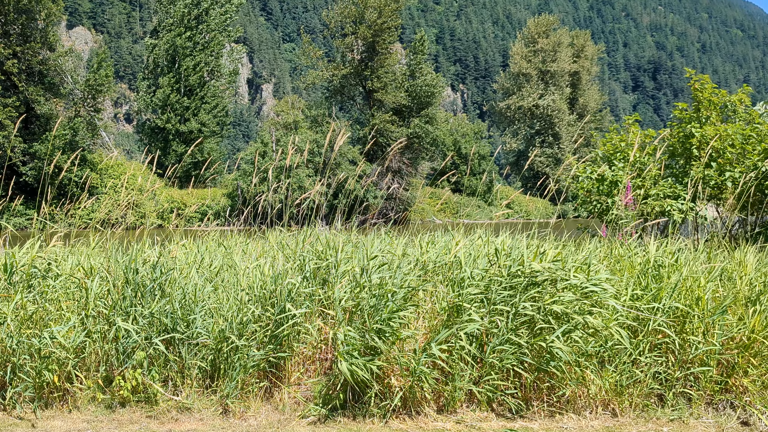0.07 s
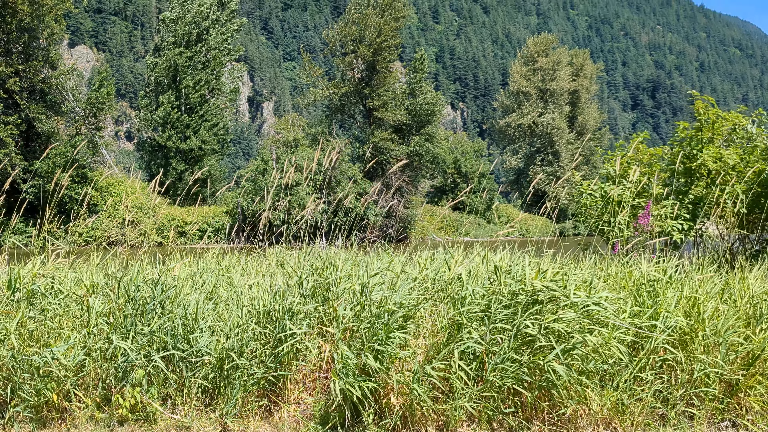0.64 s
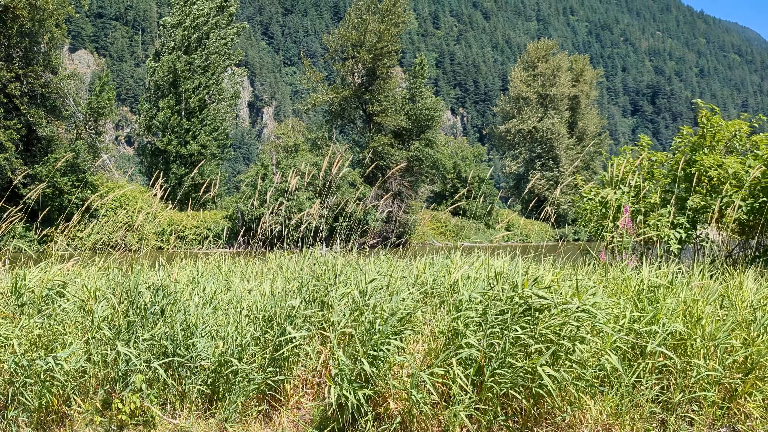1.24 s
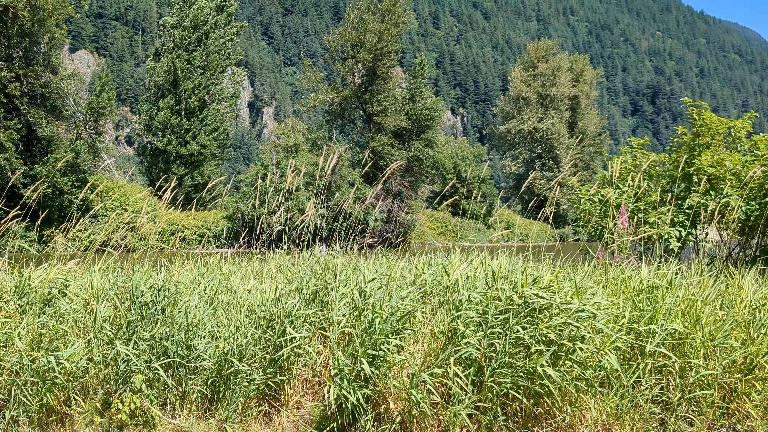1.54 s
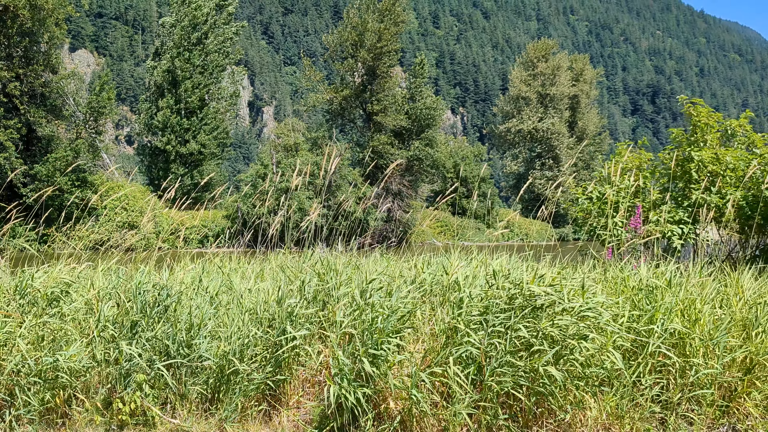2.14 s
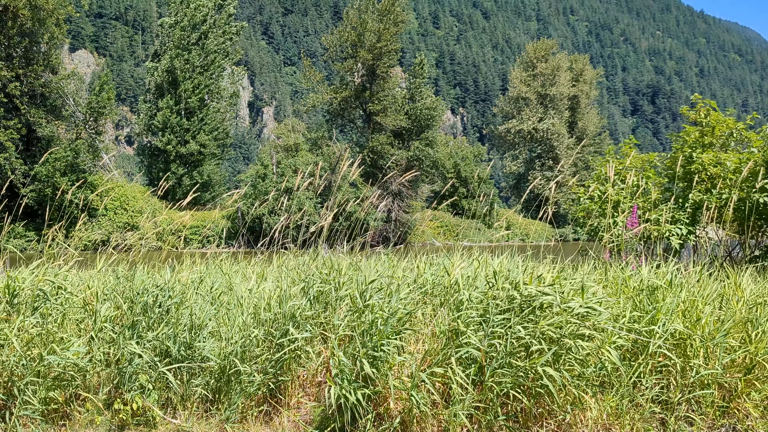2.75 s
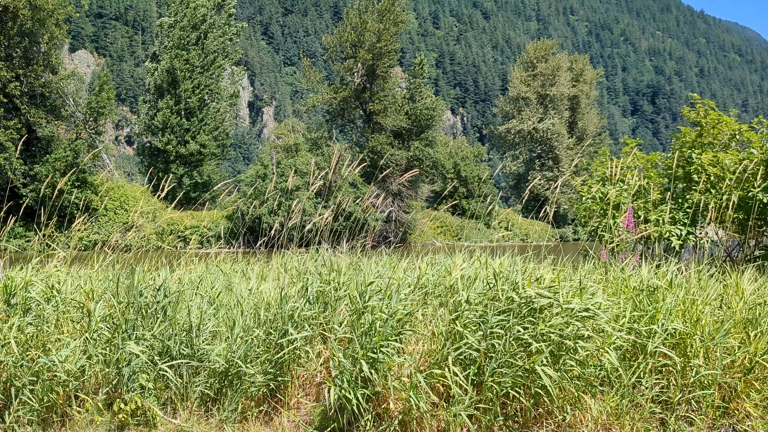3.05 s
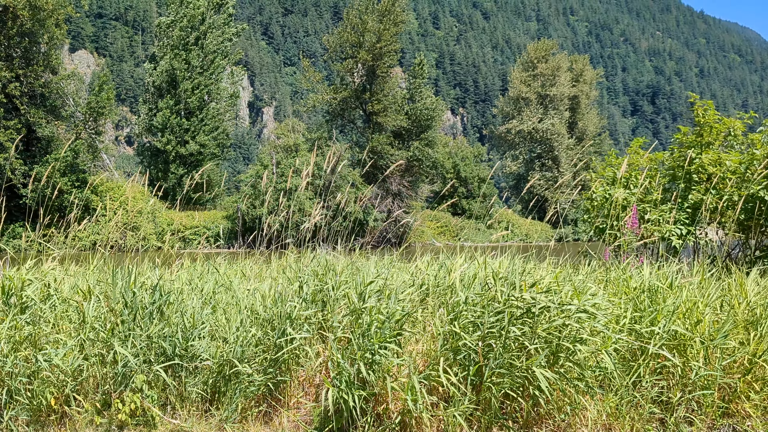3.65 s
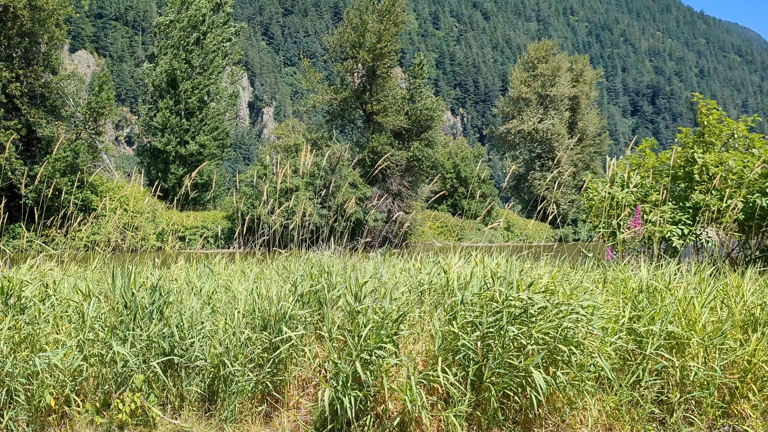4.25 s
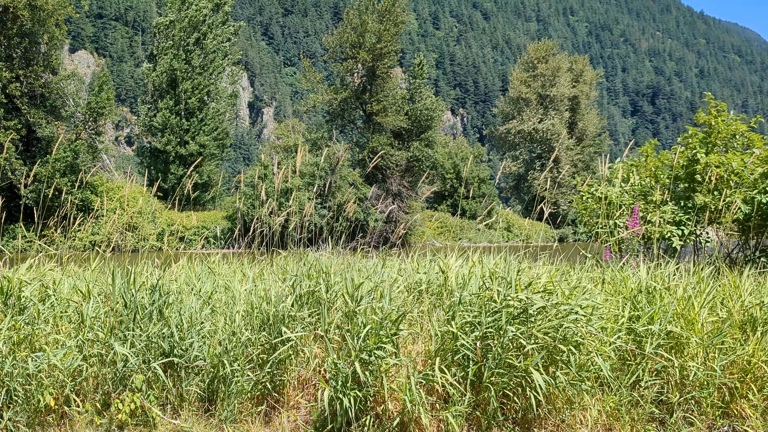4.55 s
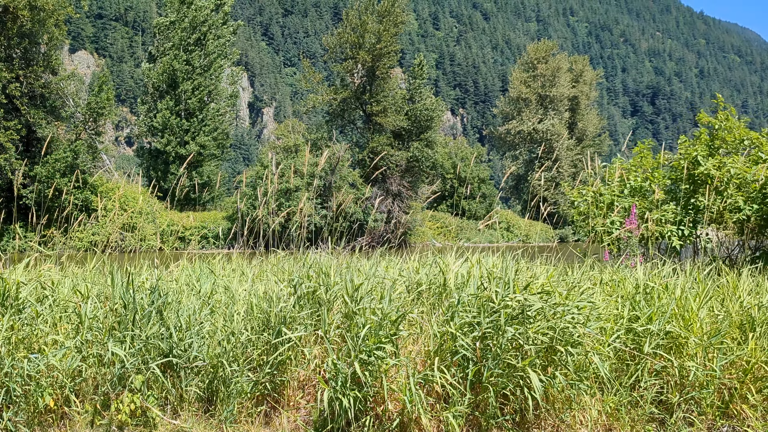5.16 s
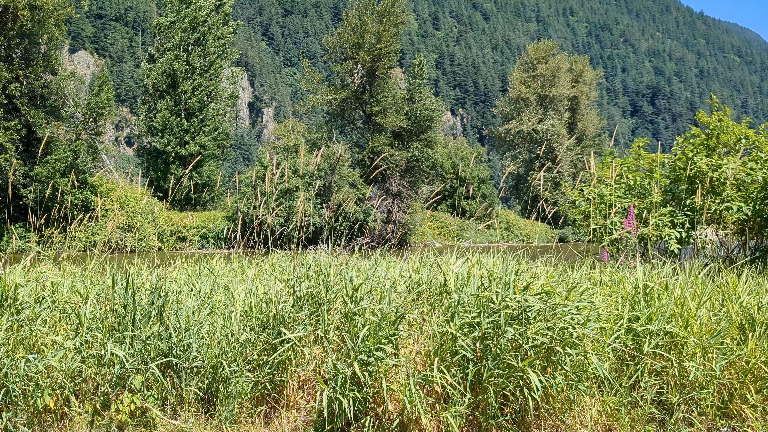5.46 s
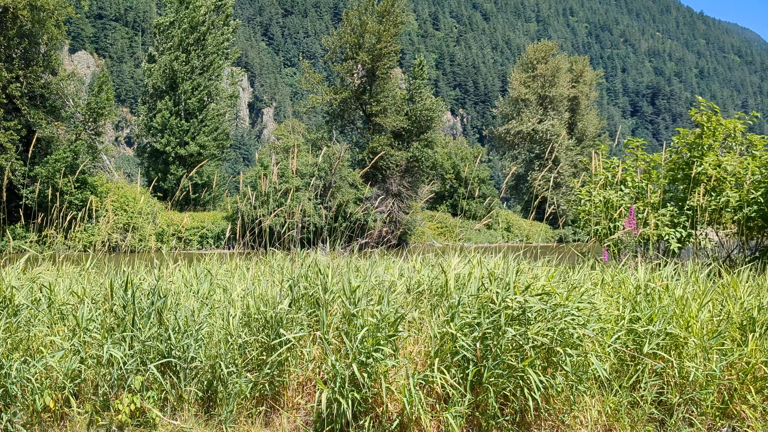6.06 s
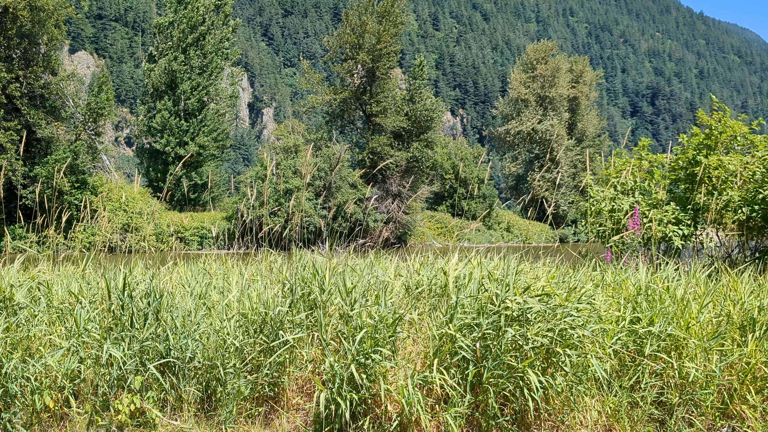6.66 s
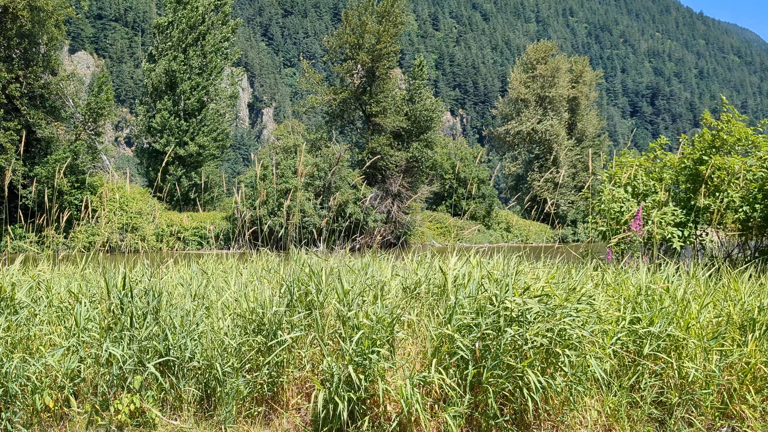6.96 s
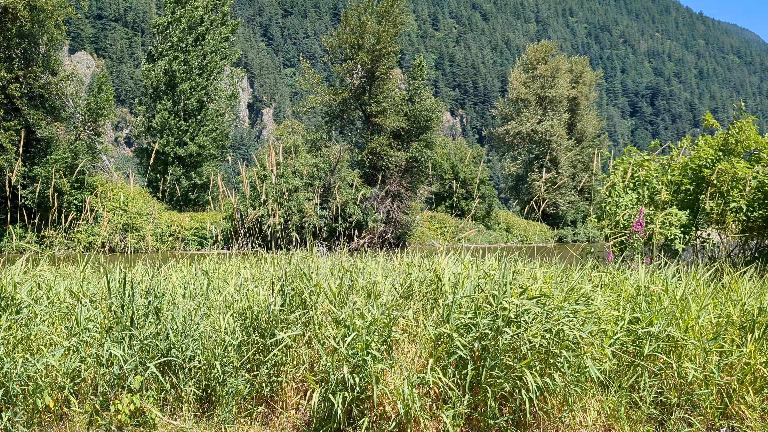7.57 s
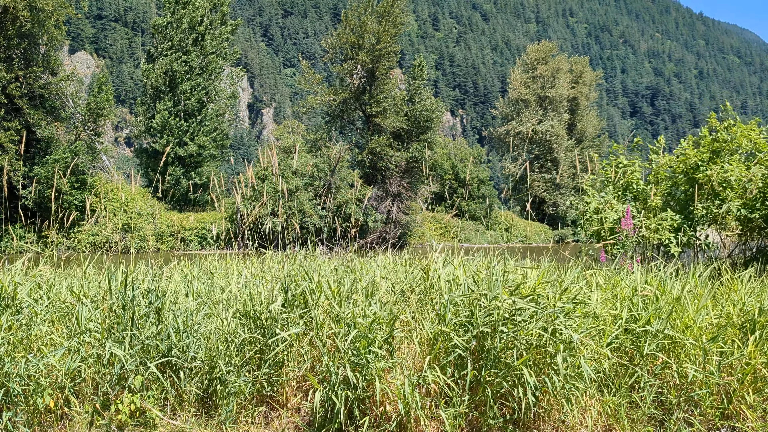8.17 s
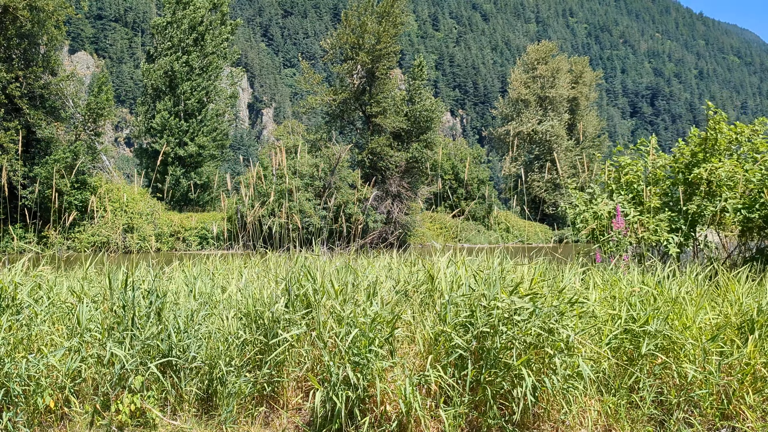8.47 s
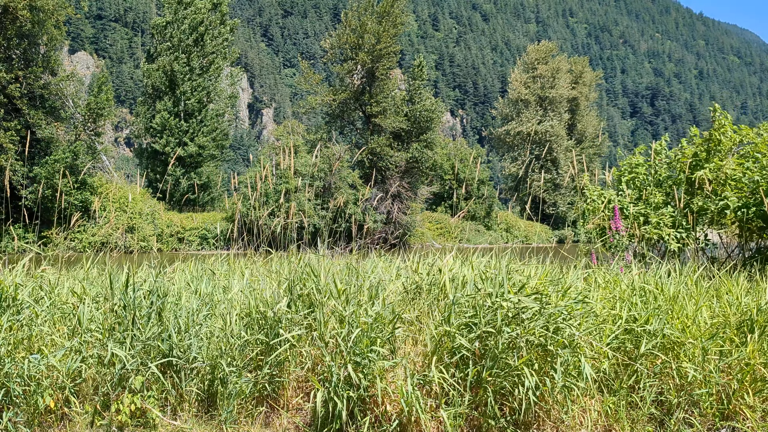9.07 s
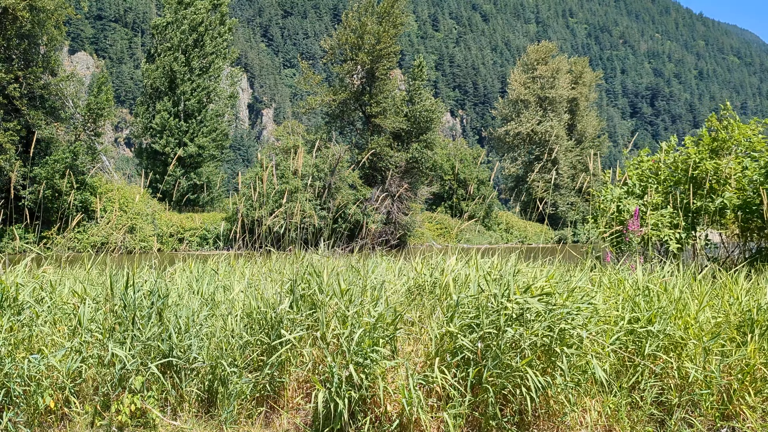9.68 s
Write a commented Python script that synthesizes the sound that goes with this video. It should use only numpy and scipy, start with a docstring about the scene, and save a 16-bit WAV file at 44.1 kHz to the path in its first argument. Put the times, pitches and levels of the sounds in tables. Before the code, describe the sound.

Outdoors by tall reeds, a gust hits the microphone with a low, fluttering rumble and short thuds, mostly on the left, while faint birds whistle and chirp far off. After about two seconds the wind drops to light puffs. The reeds hiss and tick softly, a bird twitters twice, and gentle surges of wind pass through the trees behind.

```python
"""Wind at a riverside reed bed, picked up through two small microphone ports.
A strong gust opens, its eddies buffeting the ports, while distant birds whistle and chirp.
After two seconds it drops to light puffs and leaves the nearby reeds, hissing and ticking as their
blades rub and knock. A bird twitters twice, and from about four seconds on the wind runs in surges
through the trees behind."""
import sys
import numpy as np
from scipy import signal
from scipy.fft import rfft, irfft
from scipy.io import wavfile
from scipy.ndimage import uniform_filter1d

SR = 44100
rng = np.random.default_rng(int(sys.argv[2]) if len(sys.argv) > 2 else 0)


def store_pcm(level_fs):
    """Save levels as 16-bit WAV."""
    pcm = np.round(np.clip(level_fs, -1, 1) * 32767).astype(np.int16)
    wavfile.write(sys.argv[1], SR, np.atleast_2d(pcm).T)


N = 437472
TIME = np.arange(N) / SR
LEFT, RIGHT = 1, -1
PORT_LAG_S = 0.00043  # sound's travel time from port to port

# Wind on the microphone: a gust builds, collapses and leaves a light breeze.
# Each row: time in seconds, rumble at the left port in dB, at the right port in dB.
BREEZE = [(0, -36, -38), (.37, -41, -37), (.46, -29.5, -28), (.63, -32.5, -38), (.95, -34.5, -36.5),
          (1.1, -29, -38.5), (1.6, -27, -37), (1.82, -31.5, -34), (1.95, -35.5, -48), (2.13, -41.5, -47),
          (2.42, -51.5, -42.5), (2.52, -65, -61), (2.85, -65, -59.5), (3.0, -57, -56), (4.1, -58.5, -57.5),
          (4.5, -46.5, -53), (4.78, -55, -63), (5.8, -66.5, -71.5), (6.9, -61, -63.5), (9.9, -65.5, -65.5)]
# Single puffs. Each row: crest in seconds, level in dB, length in seconds, left minus right in dB.
PUFFS = [(0.064, -30, 0.044, 10), (0.252, -30.5, .03, 7), (0.308, -26, 0.027, 20), (0.42, -16, 0.033, 13),
         (0.512, -26.5, 0.044, 5), (0.574, -24.5, 0.021, 7), (0.735, -24.5, 0.043, 5.5),
         (0.821, -24.5, 0.045, 13), (1.072, -27.5, 0.062, 4), (1.22, -26.5, 0.054, 9),
         (1.336, -25, 0.042, 5), (1.411, -22, 0.027, 14), (1.467, -19, 0.018, 18),
         (1.551, -23.5, 0.023, 18), (1.632, -19.5, .035, 14), (1.738, -22, 0.021, 18),
         (1.882, -23.5, 0.048, 26), (2.062, -29, 0.098, 18), (2.367, -38, 0.035, 1), (2.422, -40, .035, 14),
         (2.65, -47.5, 0.042, 16), (3.047, -48, 0.081, 8), (3.209, -43.5, 0.047, 1),
         (3.388, -35.5, 0.064, 10), (3.528, -35.5, 0.032, 10), (3.654, -43.5, .04, -5.5),
         (3.776, -42.5, 0.032, -12), (3.888, -41, .035, 13), (4.275, -46.5, 0.062, 2.5),
         (4.379, -39.5, 0.042, 2), (4.539, -36.5, 0.039, 18), (4.615, -44, 0.03, 22),
         (4.683, -45, 0.047, 16), (4.873, -43.5, 0.051, 20), (5.043, -51, 0.062, -14),
         (5.143, -43.5, 0.028, 12), (5.218, -48.5, 0.093, 6), (5.45, -41.5, 0.034, 4),
         (5.492, -41, 0.11, 13), (5.702, -48.5, 0.033, 19), (5.927, -39.5, 0.018, 22),
         (5.993, -47, 0.074, 5), (6.146, -55.5, 0.15, 1.5), (6.564, -50.5, 0.043, 18),
         (6.857, -56, .06, -6), (7.143, -55, .11, 11), (7.38, -55, 0.034, -11), (7.563, -44.5, 0.046, -4),
         (8.47, -53.5, 0.057, 9), (8.626, -54, 0.025, -15), (9.007, -57, 0.11, 10), (9.422, -44, .03, 22),
         (9.646, -50.5, 0.1, 19)]
# Rumble of a light puff on a port. Each row: frequency in Hz, relative spectral level in dB.
RUMBLE_SPECTRUM = [(20, -9), (45, 4.5), (85, 5.5), (130, 3), (175, -5), (250, -14.5), (350, -24.5),
                   (500, -34.5), (800, -62), (1500, -61)]
# Size of the passing eddies. Each row: time in seconds, stretch of the rumble (under 1 is large, dull).
EDDY_STRETCH = [(0, 0.51), (.6, 0.64), (1.0, 0.88), (1.4, 0.85), (1.7, 0.95), (2.05, 1.33), (2.6, 1.02),
                (3.4, 1.15), (4.4, 0.91), (5.5, 0.95), (6.2, 0.81), (9.5, 0.8)]
# Sharp eddies on the left port.
# Each row: crest in seconds, level in dB, half-width in seconds, stretch of the rumble.
SLAPS = [(0.048, -21, 0.0055, 1.03), (0.417, -14.5, 0.0093, 1.2), (0.443, -27, .008, 0.88),
         (1.021, -17.5, 0.0053, 1.6), (1.456, -21.5, .008, 2), (1.552, -16.5, 0.009, 1.85),
         (1.611, -19, 0.012, 2.97), (1.663, -25, 0.013, 3.2), (1.721, -23.5, 0.0027, 2.3),
         (1.742, -18, 0.0026, 2.75), (1.858, -16.5, 0.0043, 3.26), (1.874, -23, 0.0063, 3.8),
         (1.923, -17.5, 0.0032, 3.35), (2.42, -26, 0.0048, 2.2), (3.014, -38, 0.0038, 1.7),
         (3.379, -30.5, 0.003, 2.1), (4.603, -34.5, 0.0054, 1.57)]

# Hiss of the reeds near the microphone. Each row: time in seconds, level in dB.
REED_LEVEL = [(0, -104), (.07, -70), (.24, -66.5), (.85, -63.5), (3.1, -62), (4.4, -61), (5.2, -62),
              (7.9, -62), (9.9, -62)]
# Colour of that hiss. Each row: frequency in Hz, relative spectral level in dB.
REED_SPECTRUM = [(450, -59), (800, -37), (1500, -32.5), (2000, -27.5), (2800, -32.5), (4400, -32.5),
                 (5500, -37.5), (7000, -36.5), (8000, -41), (9200, -37.5), (10500, -39), (12300, -36.5),
                 (14000, -44.5), (15200, -43)]
# The finest fizz of the blades comes and goes. Each row: time in seconds, top treble gain in dB.
REED_FIZZ = [(0, -0.5), (5.5, -1.5), (5.62, -5), (6.1, -4), (6.25, -2), (7.9, 0), (9.9, -2)]
# Level of the distant rush as picked up; it ducks abruptly near 1.7 s, probably the recorder's
# wind suppression. Each row: time in seconds, level in dB.
RUSH_LEVEL = [(0.05, -59), (.4, -59), (1.55, -56), (1.72, -64.5), (2.45, -65), (4.4, -66), (5.3, -65.5),
              (5.6, -65.5), (6.25, -66), (6.5, -62.5), (7.6, -63), (7.8, -61), (9.4, -59), (9.7, -62.5),
              (9.9, -56.5)]
# Colour of the trees behind the reeds. Each row: frequency in Hz, relative spectral level in dB.
TREE_SPECTRUM = [(60, -41), (250, -35), (480, -36), (620, -29), (800, -26.5), (1200, -31.5), (2000, -28),
                 (2800, -39.5), (4200, -39.5), (5500, -50.5), (8000, -93)]
# Surges through the crowns. Each row: crest in seconds, rise above RUSH_LEVEL in dB.
TREE_SURGES = [(4.15, 3.5), (4.99, 6), (5.44, 6.5), (6.40, 5.5), (6.52, 2), (6.72, 3), (6.98, 0.5),
               (7.33, 5), (7.48, 5), (7.76, 3), (8.22, 2.5), (8.46, 3.5), (8.78, 3), (9.3, 1), (9.54, 4.5),
               (9.85, 1.5)]
# The two ports differ in colour. Each row: frequency in Hz, left minus right in dB.
PORT_BALANCE = [(700, 1.1), (1900, 2.2), (2800, -0.5), (3700, 4), (5200, -1), (7200, 1.5), (10000, 1.4),
                (12000, -0.5), (13700, 2), (15000, -8)]

# Thin, even whistles far off. Each row: start and length in seconds, pitch in Hz, relative level in dB.
WHISTLES = [(.36, .075, 3910, -64.5), (.565, .04, 3910, -65), (.62, 0.096, 3890, -64),
            (.74, 0.071, 3830, -68), (.82, .37, 4810, -76.5), (7.237, .01, 9000, -59)]
# Falling chirps. Each row: start and length in seconds, opening pitch in Hz, relative level in dB.
CHIRPS = [(1.18, .04, 4700, -63), (1.295, 0.042, 4650, -56), (1.41, 0.064, 5100, -56),
          (1.493, .03, 5300, -64), (1.545, 0.045, 4700, -62), (3.168, 0.033, 5450, -64),
          (3.232, .026, 5200, -65), (3.562, .052, 6300, -62.5), (3.645, 0.047, 5500, -63)]
# A downward zip and its buzzy landing.
# Each row: start and length in seconds, first, middle and last pitch in Hz, relative level in dB.
ZIP_NOTES = [(1.464, 0.029, 7100, 5500, 3180, -62.5), (1.479, .036, 4310, 3470, 3400, -61)]
# A hooked twitter, sung twice. Each row: start in seconds, relative level in dB.
TWITTERS = [(3.353, -59.5), (3.772, -57.5)]
# The notes of one twitter.
# Each row: offset and length in seconds, first, middle and last pitch in Hz, relative level in dB.
TWITTER_NOTES = [(0, 0.0368, 3390, 4420, 4250, 2), (0.047, 0.023, 4460, 5050, 5600, -2.5),
                 (0.066, .018, 5400, 4300, 3400, -5), (.127, .028, 3350, 3470, 3660, -5)]


def buffet(port, trim_db, knee_db, octaves_per_db, port_stretch, flutter_db, lump_db):
    """Wind right on one port: a lumpy breeze plus puffs, fluttering, and brighter past the knee."""
    breeze = [(s, left if port == LEFT else right) for s, left, right in BREEZE]
    breeze_db = follow(breeze, TIME) + lump_db * waver(rate_hz=18)
    flow = np.hypot(amp(breeze_db), puffs(port))
    level_db = 20 * np.log10(flow) + flutter_db * waver(rate_hz=39)
    octaves_up = octaves_per_db * np.maximum(level_db - knee_db, 0)
    stretch = port_stretch * follow(EDDY_STRETCH, TIME) * 2 ** octaves_up
    return turbulence(level_db + trim_db, stretch)


def puffs(port, rise_share=0.49):
    """Pressure of the puffs on one port: each swells and dies away at nearly the same pace."""
    power = np.zeros(N)
    for s, db, length, balance_db in PUFFS:
        near = abs(TIME - s) < 2 * length
        t = (TIME[near] - s) / length
        width = np.where(t < 0, rise_share, 1 - rise_share)
        crest = amp(db + min(port * balance_db, 0))
        power[near] += crest ** 2 * np.exp(-(t / width) ** 2)
    return np.sqrt(power)


def slaps():
    """Single eddies hit a port as short thuds, each with its own brightness."""
    push = sum(amp(db) * np.exp(-((TIME - s) / width) ** 2) for s, db, width, _ in SLAPS)
    stretch = follow([(s, stretch) for s, _, _, stretch in SLAPS], TIME)
    return turbulence(20 * np.log10(push + 1e-9), stretch)


def turbulence(level_db, stretch):
    """Rumble at a port; faster air sheds smaller eddies and stretches the spectrum upwards."""
    hz = np.fft.rfftfreq(N, 1 / SR)
    white = rfft(rng.standard_normal(N))
    rumble, power = np.zeros(N), np.zeros(N)
    for centre_hz in np.geomspace(20, 2560, num=15):
        half_octaves = np.clip(2 * np.log2((hz + 1e-9) / centre_hz), -1, 1)
        band = unit(irfft(white * np.cos(np.pi / 2 * half_octaves), N))
        gain = amp(colour(RUMBLE_SPECTRUM, centre_hz / stretch)) * np.sqrt(centre_hz)
        rumble += gain * band
        power += gain ** 2
    rumble /= np.sqrt(power)
    # the strength of the flow sets the loudness; single eddies only shape the wave
    local_power = uniform_filter1d(uniform_filter1d(rumble ** 2, size=1100), size=1100)
    return amp(level_db) * rumble / np.sqrt(local_power + 0.04)


def reeds(level_db, tick_db, fizz_hz):
    """Blades slide over each other in a hiss, with ticks from the stems nearest the microphone."""
    rustle = unit(rng.standard_normal((2, N)) + amp(tick_db) * leaf_ticks(per_s=1500, spread_db=3.5))
    fizz = signal.sosfiltfilt(signal.butter(4, fizz_hz, "highpass", fs=SR, output="sos"), rustle)
    rustle += (amp(follow(REED_FIZZ, TIME)) - 1) * fizz
    sway = amp(0.35 * waver(rate_hz=12))
    hiss = foliage(REED_LEVEL, REED_SPECTRUM, rustle,
                   coherence=0.35, lean=1.0, patch_db=0.35, flicker_db=0.33)
    return amp(level_db) * sway * hiss


def leaf_ticks(per_s, spread_db):
    """Dry blades knock together: many tiny ticks and a few larger ones."""
    size = amp(spread_db * np.minimum(rng.exponential(1, (2, N)), 5))
    polarity = rng.choice([-1, 1], (2, N))
    knocks = rng.random((2, N)) < per_s / SR
    return unit(size * polarity * knocks)


def trees(level_db, waver_db, rise_s, fall_s):
    """The smooth rush of crowns farther off; each surge rises quickly and ebbs."""
    surge_db = sum(db * np.exp(-((TIME - s) / np.where(TIME < s, rise_s, fall_s)) ** 2)
                   for s, db in TREE_SURGES)
    swell = amp(level_db + surge_db + waver_db * waver(rate_hz=5.6))
    return swell * foliage(RUSH_LEVEL, TREE_SPECTRUM, rng.standard_normal((2, N)),
                           coherence=1.0, lean=0.55, patch_db=1.4, flicker_db=0.23)


def foliage(level, spectrum, rustle, coherence, lean, patch_db, flicker_db):
    """Leaves all round the microphone, more to the right; clumps stir and settle at random."""
    hz, t, (right, independent) = signal.stft(rustle, SR, nperseg=512, noverlap=384)
    side = np.cos(np.linspace(0, np.pi, num=90))  # 1 is hard right, -1 hard left
    weight = np.exp(lean * side)
    # each direction reaches the two ports with its own delay
    delays = np.exp(-2j * np.pi * PORT_LAG_S * np.outer(hz, side))
    shared = (coherence * delays @ weight / weight.sum())[:, None]
    left = shared * right + np.sqrt(np.maximum(1 - abs(shared) ** 2, 0)) * independent
    patches = uniform_filter1d(rng.standard_normal(right.shape), size=16, axis=0)
    patches = unit(uniform_filter1d(patches, size=24, axis=1))
    flicker = unit(uniform_filter1d(rng.standard_normal(len(t)), size=9))
    db = colour(spectrum, hz)[:, None] + follow(level, t) + patch_db * patches + flicker_db * flicker
    tilt_db = colour(PORT_BALANCE, hz)[:, None] / 2
    ports = np.array([left * amp(db + tilt_db), right * amp(db - tilt_db)])
    return np.sqrt(SR / 2) * signal.istft(ports, SR, nperseg=512, noverlap=384)[1][:, :N]


def birds(level_db, echo_db, t60_s, quaver, flutter_db):
    """Distant notes, rougher the wider they glide, scattered by wind and trees on their way."""
    song, unsteady = np.zeros(N), waver(rate_hz=340)
    for s, length, *pitches, db in bird_notes(chirp_fall_hz_per_s=28000):
        progress = np.linspace(0, 1, round(length * SR))
        hz = np.polyval(np.polyfit([0, 0.5, 1], pitches, 2), progress)
        hz += quaver * np.ptp(hz) * unsteady[round(s * SR):][:len(hz)]
        note = np.sin(2 * np.pi * np.cumsum(hz) / SR) * signal.windows.tukey(len(hz), 0.5)
        add(song, s, amp(db) * unit(note))
    song *= amp(flutter_db * waver(rate_hz=52))
    t = TIME[:SR // 2]
    tail = rng.standard_normal((2, len(t))) * amp(-60 * t / t60_s)
    echo = signal.fftconvolve(song[None], tail / np.linalg.norm(tail[0]), axes=1)[:, :N]
    return amp(level_db) * (song + amp(echo_db) * echo)


def bird_notes(chirp_fall_hz_per_s):
    """Every note the birds sing, in rows laid out like ZIP_NOTES."""
    notes = [(s, length, hz, hz, hz, db) for s, length, hz, db in WHISTLES]
    for s, length, hz, db in CHIRPS:
        fall_hz = chirp_fall_hz_per_s * length
        notes.append((s, length, hz, hz - fall_hz / 2, hz - fall_hz, db))
    for s, db in TWITTERS:
        notes += [(s + offset, *glide, db + note_db) for offset, *glide, note_db in TWITTER_NOTES]
    return notes + ZIP_NOTES


def amp(db):
    """Decibels to gain."""
    return 10 ** (np.asarray(db) / 20)


def unit(x):
    """Scales to rms 1."""
    return x / np.sqrt(np.mean(x ** 2) + 1e-20)


def follow(curve, t):
    """Reads a curve at the times t."""
    return np.interp(t, *np.transpose(curve))


def colour(spectrum, hz):
    """Reads a spectrum on a log-frequency axis."""
    points_hz, db = np.transpose(spectrum)
    return np.interp(np.log(hz + 1), np.log(points_hz), db)


def waver(rate_hz):
    """Smooth random drift of rms 1, moving up to about the given rate."""
    hz = np.fft.rfftfreq(N, 1 / SR)
    return unit(irfft(rfft(rng.standard_normal(N)) * np.exp(-(hz / rate_hz) ** 2), N))


def add(mix, s, sound):
    """Mixes a sound in at s seconds."""
    part = mix[round(s * SR):][:len(sound)]
    part += sound[:len(part)]


def scene():
    """At the microphone each port has its own turbulence; reeds, trees and birds reach both."""
    left = buffet(LEFT, trim_db=0.0, knee_db=-48.0, octaves_per_db=0.0326,
                  port_stretch=0.96, flutter_db=2.0, lump_db=3.0) + slaps()
    right = buffet(RIGHT, trim_db=0.7, knee_db=-51.5, octaves_per_db=0.043,
                   port_stretch=0.97, flutter_db=2.5, lump_db=2.5)
    hiss = reeds(level_db=0.03, tick_db=-9, fizz_hz=8100)
    rush = trees(level_db=-0.24, waver_db=0.86, rise_s=0.056, fall_s=0.071)
    song = birds(level_db=-2.5, echo_db=-4, t60_s=0.46, quaver=0.065, flutter_db=3.0)
    return np.array([left, right]) + hiss + rush + song


def record(dry):
    """The recorder fades in, and cuts the deepest rumble and the top treble."""
    fade_in = np.clip((TIME - 0.034) / 0.012, 0, 1)
    low_cut = signal.butter(4, 40, "highpass", fs=SR, output="sos")
    high_cut = signal.firwin(1023, 15730, window=("kaiser", 9), fs=SR)
    return signal.oaconvolve(signal.sosfilt(low_cut, dry * fade_in), high_cut[None], "same")


dry = scene()
out = record(dry)
store_pcm(out)
```